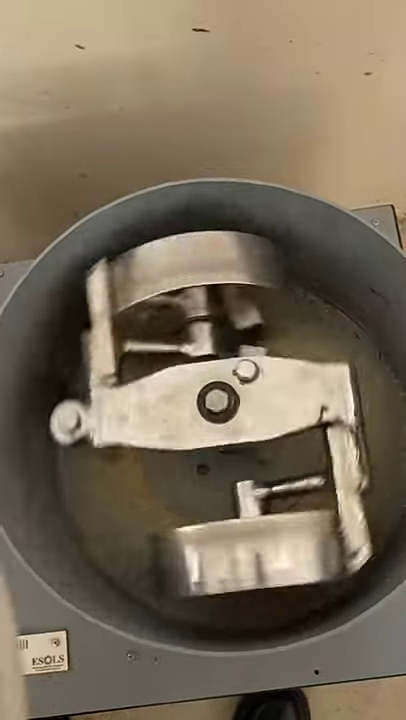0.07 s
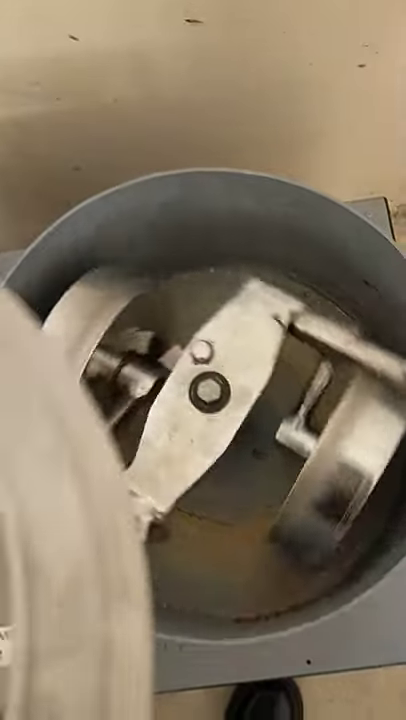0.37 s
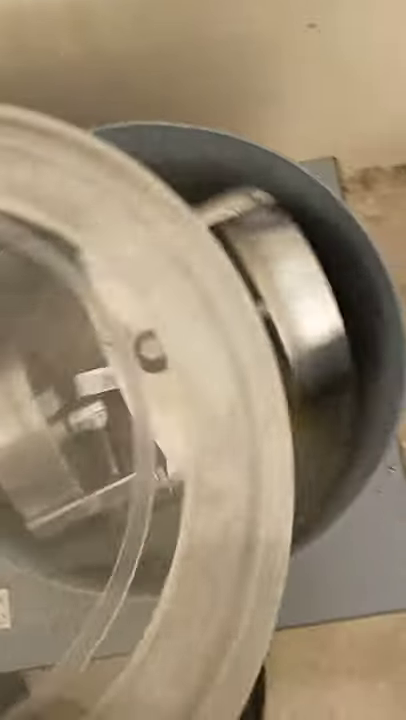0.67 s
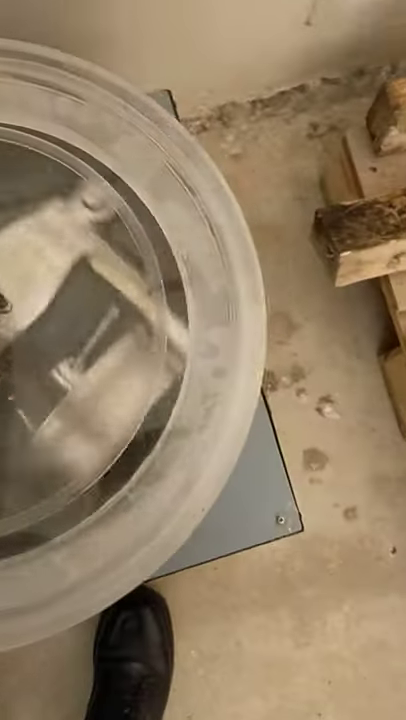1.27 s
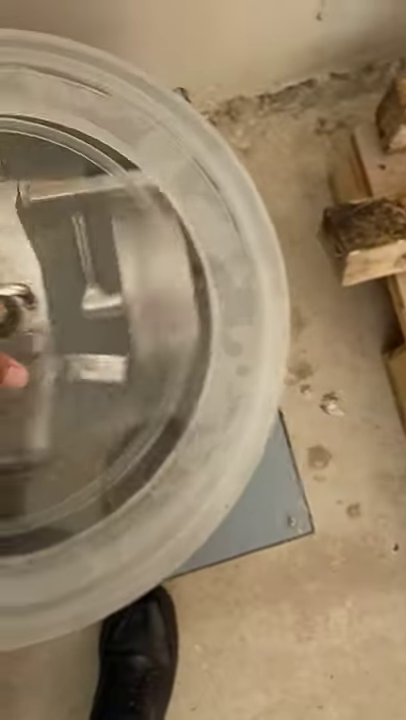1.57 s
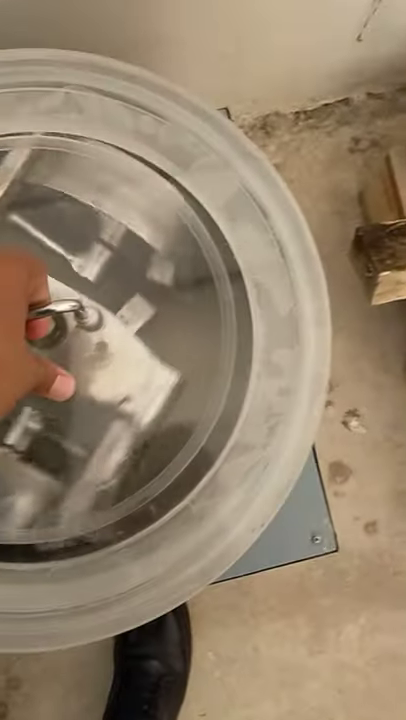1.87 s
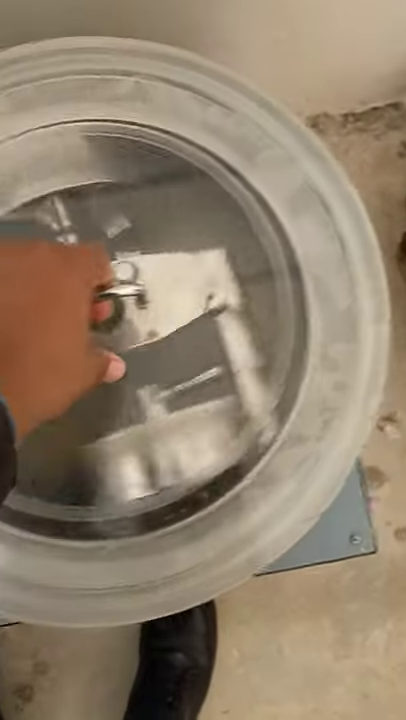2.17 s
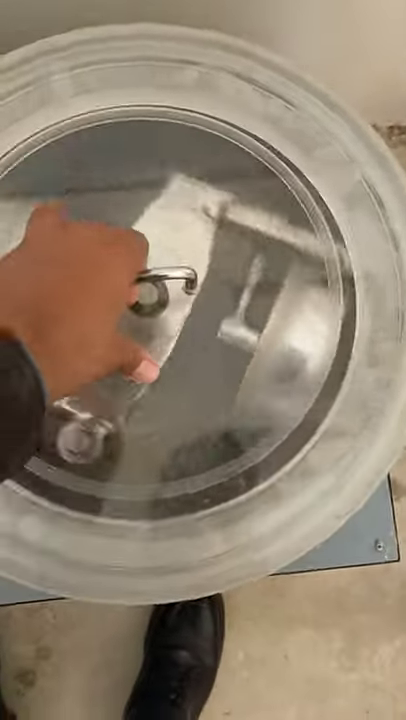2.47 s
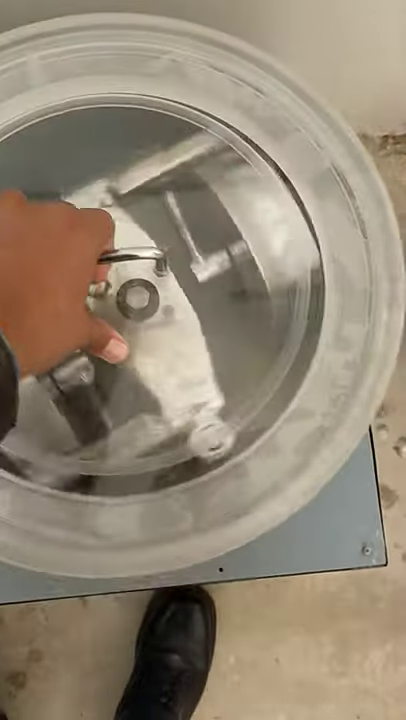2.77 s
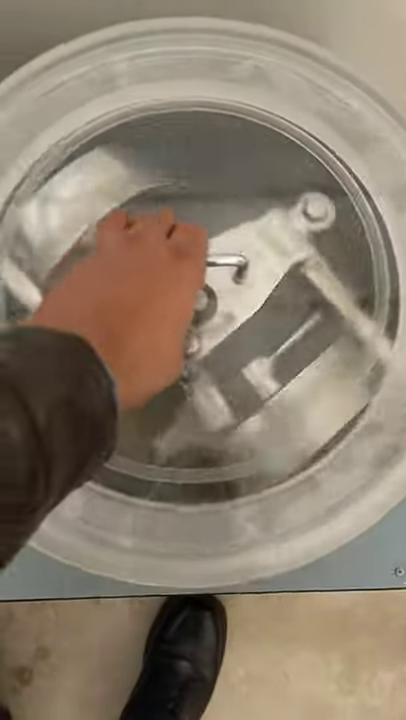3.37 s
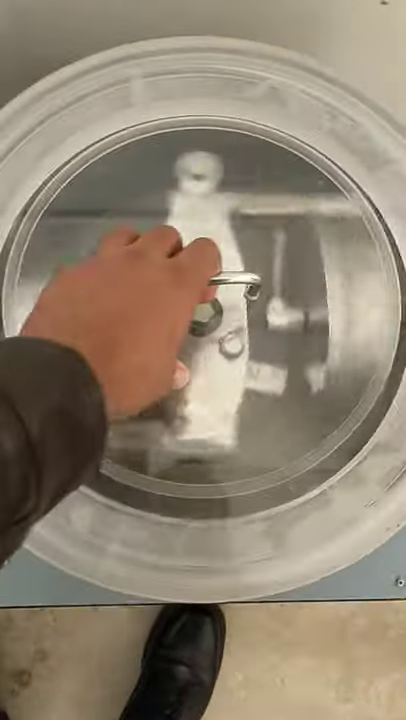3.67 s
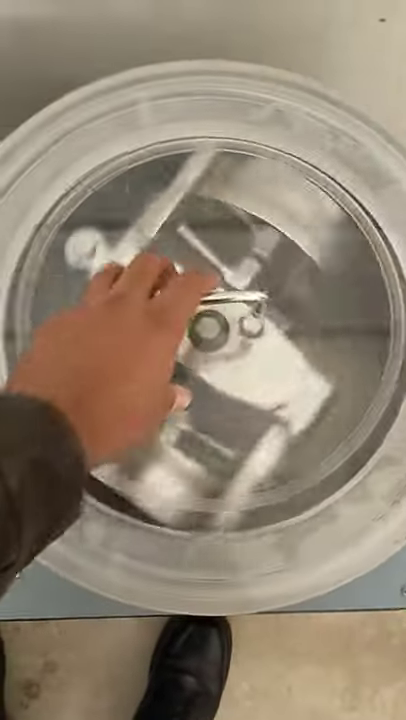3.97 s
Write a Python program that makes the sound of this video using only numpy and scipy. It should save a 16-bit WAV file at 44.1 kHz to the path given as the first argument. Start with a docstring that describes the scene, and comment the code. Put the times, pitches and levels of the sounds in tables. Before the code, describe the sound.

Rollers bump around a mill's steel drum with a low, humming rumble. Close by, a plastic lid scrapes and knocks on the rim in two bouts before snapping shut sharply, the hits echoing off hard workshop walls.

```python
"""A low, uneven rumble over a hum: a roller mill's rollers bump round its steel drum, its arms clank.
A plastic lid clinks at its metal handle, slides over the drum, knocks on the rim and at last snaps
into its seat, ringing the steel. A sleeve rustles. Lid and arms echo in a large, hard-walled
workshop; a limiter ducks on the hardest hit."""
import sys
import numpy as np
from scipy import signal
from scipy.fft import rfft, irfft
from scipy.io import wavfile
from scipy.ndimage import uniform_filter1d, minimum_filter1d

SR = 44100
rng = np.random.default_rng(int(sys.argv[2]) if len(sys.argv) > 2 else 0)


def wav_out(sig):
    """Save sig, one row per channel (or a flat mono array), as 16-bit PCM at SR to the path in sys.argv[1]."""
    wavfile.write(sys.argv[1], SR, np.round(np.clip(np.atleast_2d(sig).T, -1, 1) * 32767).astype(np.int16))


N = 176400
TIME_S, HIT_TIME_S = np.arange(N) / SR, np.arange(SR // 2) / SR
TOP_HZ, CLATTER_T60_S = 15950, 0.0987

# Dense upper modes of lid and arms. Each row: frequency in Hz, relative density in dB.
CLATTER_SPECTRUM = [(150, -16.5), (400, -1.5), (650, -3.5), (900, 12), (1150, -5.5), (1700, -2),
                    (2300, -2.5), (3050, -2.5), (3400, -12.5), (4500, -14), (5500, -25.5), (9000, -20.5),
                    (16000, -42.5)]


def undb(db):
    """Decibels to gain."""
    return 10 ** (np.asarray(db) / 20)


def unit(x):
    """Scale to rms 1."""
    return x / np.sqrt(np.mean(x ** 2))


def along_hz(points, hz):
    """Interpolate (Hz, value) points on a log-frequency axis."""
    p = np.array(points, float)
    return np.interp(np.log(np.maximum(hz, 1)), np.log(p[:, 0]), p[:, 1])


def colour(x, spectrum):
    """Filter by (Hz, dB) points; rms 1."""
    gain = undb(along_hz(spectrum, np.fft.rfftfreq(len(x), 1 / SR)))
    return unit(irfft(rfft(x) * gain, len(x)))


def resonate(x, hz, width_hz):
    """One resonance applied twice for steep skirts; rms 1."""
    f = np.maximum(np.fft.rfftfreq(len(x), 1 / SR), 1)
    detuning = (f / hz - hz / f) * hz / width_hz / np.sqrt(2)
    return unit(irfft(rfft(x) / (1 + 1j * detuning) ** 2, len(x)))


def fade(t60_s, t=HIT_TIME_S):
    """Exponential decay."""
    return np.exp(-np.log(1000) * t / t60_s)


def wander(rate_hz):
    """Smooth random drift; rms 1."""
    span = int(SR / rate_hz)
    return unit(uniform_filter1d(uniform_filter1d(rng.standard_normal(N), span), span))


def grains(per_s):
    """Tiny random impacts."""
    return rng.standard_normal(N) * (rng.random(N) < per_s / SR)


def place(hits):
    """Mix (start in s, sound) pairs into one track."""
    track = np.zeros(N)
    for start_s, sound in hits:
        i = int(start_s * SR)
        track[i:i + len(sound)] += sound[:N - i]
    return track


def swells(rows):
    """Envelope with one quick rise and slower fall per row."""
    envelope = np.zeros(N)
    for start_s, length_s, db in rows:
        ramp = np.interp(TIME_S, [start_s, start_s + 0.344 * length_s, start_s + length_s], [0, 1, 0])
        envelope += undb(db) * np.sin(np.pi / 2 * ramp)
    return envelope


def ring(modes):
    """Damped modes; level, tuning and polarity scatter from hit to hit."""
    sound = np.zeros(len(HIT_TIME_S))
    for hz, db, t60_s in modes:
        level, tuning, polarity = rng.standard_normal(3)
        tone = np.sin(2 * np.pi * hz * (1 + 0.00413 * tuning) * HIT_TIME_S)
        sound += undb(db + 2 * level) * np.sign(polarity) * tone * fade(t60_s)
    return sound


def burst(spectrum, t60_s):
    """Modes too dense to resolve: decaying coloured noise."""
    return colour(rng.standard_normal(len(HIT_TIME_S)), spectrum) * fade(t60_s)


def drum_rumble():
    """Rollers bump along the drum and ring it with changing force."""
    # Drum and stand resonances. Each row: frequency in Hz, width in Hz, relative level in dB.
    modes = [(113.11, 12.06, 4), (92.78, 3.12, -12.5), (129.73, 13.3, -14), (151.33, 6.97, -14),
             (170.9, 19.6, -15)]
    # Roller force. Each row: time in seconds, relative level in dB.
    force_curve = [(0.0, -34), (0.08, -39), (0.191, -17.5), (0.26, -31.5), (0.32, -20), (0.41, -27),
                   (0.44, -23.5), (0.57, -34), (0.67, -23.5), (0.72, -38), (0.81, -22.5), (0.86, -39),
                   (0.929, -21), (0.981, -39), (1.09, -14.5), (1.12, -27.5), (1.16, -16.5), (1.24, -26),
                   (1.38, -33.5), (1.4, -18.5), (1.61, -38), (1.65, -30), (1.77, -37), (1.791, -22.5),
                   (1.87, -33), (1.89, -24), (2.049, -36.5), (2.09, -29), (2.13, -34), (2.18, -24),
                   (2.23, -19), (2.26, -26), (2.509, -23.5), (2.64, -34), (2.96, -24.5), (3.07, -39),
                   (3.111, -18), (3.13, -30.5), (3.24, -22.5), (3.29, -33), (3.5, -29), (3.56, -33),
                   (3.61, -29), (3.69, -43.5), (3.719, -29), (3.87, -23.5), (3.92, -29), (3.97, -23),
                   (4.0, -36)]
    bumps = grains(per_s=300)
    rumble = sum(undb(db) * resonate(np.roll(bumps, k * SR // 10), hz, width_hz)
                 for k, (hz, width_hz, db) in enumerate(modes))
    span = int(0.0623 * SR)
    power = uniform_filter1d(uniform_filter1d(rumble ** 2, span), span // 2)
    force_db = np.interp(TIME_S, *np.array(force_curve).T) - 0.5
    return rumble / np.sqrt(power) * undb(force_db)  # levelled, so the force sets the envelope


def lid_knocks():
    """Rim contacts ring the lid and thud in the drum: dull if soft, hollow if flat, a crack if edge-on."""
    # Each row: start in seconds, strength in dB, low-pass in Hz, relative dB of thud, clonk and crack.
    contacts = [(1.05,-37,4000,-4,-23,5), (1.103,-27.5,1600,12,-10.5,-19), (1.3517,-14.5,2844,-2,3.5,-13),
                (1.391,-16.5,1500,-0.5,1,-38.5), (1.399,-19,1610,8.5,-15.5,-34),
                (1.4259,-22,1100,-2.5,-1.5,-36.5), (2.7253,-22,2210,2,-8.5,-40.5),
                (2.7937,-29.5,2180,-2.5,-14,-13), (2.813,-21.5,1870,7,-16,-26.5),
                (2.817,-13.5,2470,-11,-22.5,-14), (2.828,-16.5,2200,0,-20,-11.5),
                (2.944,-27.5,1300,8,-12,-25), (3.098,-32,3480,9.5,-28.5,-0.5),
                (3.113,-20.5,1460,1.5,-3,-23), (3.406,-30,1200,12,-8.5,-25.5), (3.471,-22,2560,9,-11,-38.5),
                (3.487,-19.5,896,7.5,-19,-30.5)]
    # Lid on the rim. Each row: frequency in Hz, relative level in dB, T60 in seconds.
    lid_modes = [(387.6,-10.5,0.151), (494,-13,0.1), (579,-8,0.186), (759.8,-8.5,0.233), (896.7,-9,0.49),
                 (1342,-5.5,0.104), (1462,-1.5,0.0697), (1661.9,-9.5,0.16), (1889.6,-5.5,0.06),
                 (2137,-4.5,0.057), (2814.6,-10,0.104)]
    # Lid landing flat. Same columns.
    hollow_modes = [(775, -3, 0.0417), (882.3, -4, 0.08), (980.3, 2.5, 0.075), (1048.4, -6, 0.0956)]
    # Hard edge. Each row: frequency in Hz, relative density in dB.
    crack_spectrum = [(800, 5), (2500, 10.5), (3900, 0.5), (5500, -9), (8300, -14), (10000, -26),
                      (16000, -27)]
    hits = []
    for start_s, db, cutoff_hz, thud_db, clonk_db, crack_db in contacts:
        thud = resonate(rng.standard_normal(len(HIT_TIME_S)), hz=145.6, width_hz=158) * fade(0.1294)
        body = undb(-8) * ring(lid_modes) + undb(-2.5) * burst(CLATTER_SPECTRUM, CLATTER_T60_S)
        softness = signal.butter(2, cutoff_hz, fs=SR, output="sos")
        blow = signal.sosfilt(softness, body + undb(thud_db - 9) * thud)
        clonk = undb(clonk_db) * ring(hollow_modes)
        crack = undb(crack_db) * burst(crack_spectrum, t60_s=0.1027)
        hits.append((start_s, undb(db) * (blow + clonk + crack)))
    return place(hits)


def lid_snap():
    """The lid seats: a pressure spike and a sharp click, then the steel rim rings."""
    # Each row: start in seconds, strength in dB.
    snaps = [(3.5065, -6)]
    # Each row: frequency in Hz, relative level in dB, T60 in seconds.
    rim_modes = [(886.8,-2,0.218), (1090,-5,0.119), (1481,-5,0.128), (1970.5,-1,0.084), (2534,-13,0.132),
                 (2880,-5,0.071), (3130,-3,0.16), (3930,-12,0.104), (4468,-10.5,0.15), (7530,-25,0.086)]
    # Dense upper rim modes. Each row: frequency in Hz, relative density in dB.
    rim_spectrum = [(300, -2), (650, -3.5), (900, 8.5), (1250, 0.5), (2000, 1.5), (3100, -2.5),
                    (3400, -20.5), (4500, -11.5), (5400, -23.5), (8300, -13.5), (9800, -38)]
    # Seating click. Same columns.
    click_spectrum = [(800,-3), (3500,0), (5000,-13), (7500,-11), (8400,-3), (9300,-18), (15000,-18),
                      (18000,-40)]
    spike_hz, spike_decay_s = 2400, 0.0001
    spike = undb(19.5) * np.sin(2 * np.pi * spike_hz * HIT_TIME_S) * np.exp(-HIT_TIME_S / spike_decay_s)
    click = undb(-4) * burst(click_spectrum, t60_s=0.0092)
    rim = undb(-12.5) * ring(rim_modes) + undb(-6) * burst(rim_spectrum, t60_s=0.09)
    return place((start_s, undb(db) * (spike + click + rim)) for start_s, db in snaps)


def lingering_pings():
    """Single modes sing on after two of the knocks: a low tone, then the lid's steel handle rings."""
    # Each row: start in seconds, level in dB, frequency in Hz, T60 in seconds.
    pings = [(2.726, -38, 610, 0.35), (2.817, -27.5, 2293, 0.38)]
    return place((start_s, undb(db) * np.sin(2 * np.pi * hz * HIT_TIME_S) * fade(t60_s))
                 for start_s, db, hz, t60_s in pings)


def lid_slides():
    """The sliding lid catches on the rim in many tiny impacts."""
    # Each row: start in seconds, length in seconds, level in dB.
    strokes = [(1.04, 0.243, -31), (2.73, 0.169, -33.5), (2.85, 0.1706, -33), (3.41, 0.179, -35)]
    # Each row: frequency in Hz, relative density in dB.
    scrape_spectrum = [(150, 5.5), (350, -1.5), (800, 4), (1400, -2.5), (2500, -15.5), (4000, -31),
                       (8000, -34), (16000, -36)]
    scrape = colour(grains(per_s=1800), scrape_spectrum)
    return scrape * swells(strokes) * undb(0.71 * wander(rate_hz=67))


def arm_clanks():
    """Steel roller arms clank in their pivots."""
    # Each row: start in seconds, strength in dB.
    clanks = [(.121, -34.5), (.167, -29.5), (2.216, -34.5)]
    # Each row: frequency in Hz, relative level in dB, T60 in seconds.
    arm_modes = [(1094.5, -2, 0.076), (1226.4, -1.5, 0.034), (1456.8, -4.5, 0.0745), (1836, -14, 0.068)]
    hits = []
    for start_s, db in clanks:
        clank = ring(arm_modes) + undb(-5.5) * burst(CLATTER_SPECTRUM, CLATTER_T60_S)
        hits.append((start_s, undb(db) * clank))
    return place(hits)


def handle_clinks():
    """The lid's metal handle rattles lightly."""
    # Each row: start in seconds, strength in dB.
    clinks = [(0.46, -47), (0.575, -42), (0.794, -41), (.868, -41), (0.887, -48), (.922, -46), (1.042, -42)]
    # Each row: frequency in Hz, relative level in dB, T60 in seconds.
    handle_modes = [(8350,-1,0.087), (10920,-12.5,0.147), (14100,-11.5,.1)]
    # Each row: frequency in Hz, relative density in dB.
    rattle_spectrum = [(1500, -25.5), (4500, 7), (6800, -0.5), (8300, 6), (9500, -3), (15500, 0)]
    attack = 1 - np.exp(-HIT_TIME_S / 0.001)
    hits = []
    for start_s, db in clinks:
        rattle = undb(-7.5) * ring(handle_modes) + burst(rattle_spectrum, t60_s=0.0795)
        hits.append((start_s, undb(db) * rattle * attack))
    return place(hits)


def drive_hum():
    """The drive hums in narrow noise bands."""
    # Each row: frequency in Hz, width in Hz, level in dB.
    bands = [(62.03, 5.3, -41), (74.8, 22.9, -43.5), (151.82, 3.93, -47), (296.62, 4.28, -44.5),
             (732.5, 4, -60)]
    return sum(undb(db) * resonate(rng.standard_normal(N), hz, width_hz) for hz, width_hz, db in bands)


def bearing_noise():
    """Rolling bearings give a broad, slightly wavering noise."""
    # Each row: frequency in Hz, relative density in dB.
    rolling_spectrum = [(25, -16), (45, -16), (90, 0), (180, 1.5), (235, -9.5), (330, -10), (480, -16.5),
                        (760, -15), (1400, -19.5), (2500, -25.5), (4200, -34.5), (5800, -43), (8300, -35.5),
                        (9500, -45), (15500, -41)]
    return colour(rng.standard_normal(N), rolling_spectrum) * undb(-38.5 + 1.5 * wander(rate_hz=12.7))


def roller_whine():
    """A roller sings faintly for a moment."""
    start_s, length_s, db = 0.52, 0.6, -57
    return resonate(rng.standard_normal(N), hz=1400, width_hz=52) * swells([(start_s, length_s, db)])


def sleeve_rustle():
    """Fine cloth friction swells with each arm movement over a faint bed."""
    # Each row: start in seconds, length in seconds, level in dB.
    movements = [(.22, 0.244, -53), (.76, 0.081, -64), (1.08, 0.258, -45.5), (1.39, 0.09, -53.5),
                 (1.84, 0.17, -62.5), (2.18, 0.0757, -53.5), (2.89, 0.098, -53), (3.16, 0.092, -52)]
    # Each row: frequency in Hz, relative density in dB.
    cloth_spectrum = [(1000, -31.5), (4200, 5), (6000, -5), (8300, 7.5), (9500, -2.5), (12000, -2),
                      (15500, 6)]
    friction = colour(grains(per_s=5000), cloth_spectrum)
    motion = swells(movements) * undb(2 * wander(rate_hz=72))
    bed = undb(-63 + 2.5 * wander(rate_hz=35.6))
    return friction * (motion + bed)


def hall_echo(x):
    """Hard walls return a diffuse echo that builds fast and lasts longest in the midrange."""
    # Each row: frequency in Hz, T60 in seconds.
    decay_times = [(100, 0.01), (400, 2.5), (900, 3), (2800, 3), (4500, 1.58), (8000, 1.45), (16000, 1.5)]
    # Each row: frequency in Hz, relative density in dB.
    echo_spectrum = [(100, 13), (400, 0.5), (900, -2.5), (1250, -5), (2000, -0.5), (3000, -5), (4500, -6),
                     (5500, -6.5), (8000, -10.5), (11000, -9), (16000, -11)]
    bins_hz, centres_hz = np.fft.rfftfreq(N, 1 / SR), np.geomspace(60, 16000, 14)
    noise = rfft(rng.standard_normal(N)) * undb(along_hz(echo_spectrum, bins_hz))
    tail = np.zeros(N)
    for hz, weights in zip(centres_hz, np.eye(len(centres_hz))):
        band = irfft(noise * along_hz(list(zip(centres_hz, weights)), bins_hz), N)
        tail += band * fade(along_hz(decay_times, hz), TIME_S)
    build_up = 1 - np.exp(-TIME_S / 0.025)
    return undb(-1.5) * signal.fftconvolve(x, tail * build_up * 2 / np.sqrt(SR))[:N]


def scene():
    """Mono mix; only lid and arms feed the hall."""
    contacts = lid_slides() + lid_knocks() + lid_snap() + handle_clinks() + arm_clanks()
    mill = drum_rumble() + drive_hum() + bearing_noise() + roller_whine()
    return (mill + contacts + lingering_pings() + hall_echo(contacts) + sleeve_rustle())[None]


def record(dry):
    """Look-ahead limiter with a brief hold, then a steep low-pass."""
    limit_db, hold_s, ahead_s = -5.5, 0.083, 0.004
    hold, ahead = int(hold_s * SR), int(ahead_s * SR)
    wanted = np.minimum(1, undb(limit_db) / (np.abs(dry[0]) + 1e-9))
    held = np.roll(minimum_filter1d(wanted, hold + 2 * ahead), hold // 2)
    gain = uniform_filter1d(held, 2 * ahead)
    return signal.sosfilt(signal.ellip(10, .2, 80, TOP_HZ, fs=SR, output="sos"), dry * gain)


dry = scene()
out = record(dry)
wav_out(out)
```